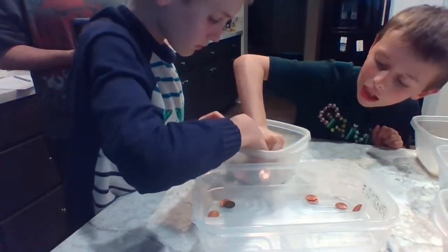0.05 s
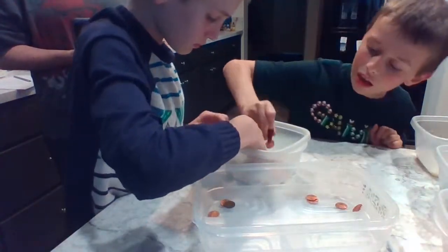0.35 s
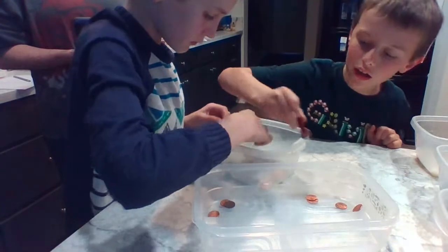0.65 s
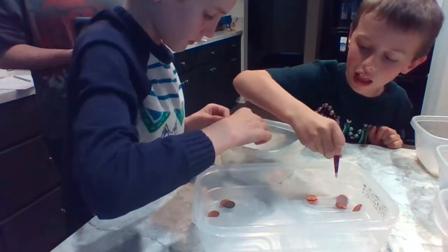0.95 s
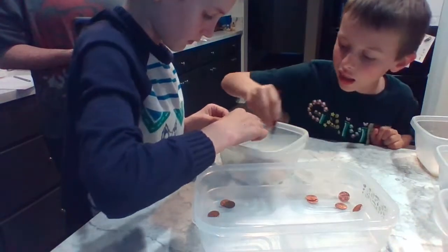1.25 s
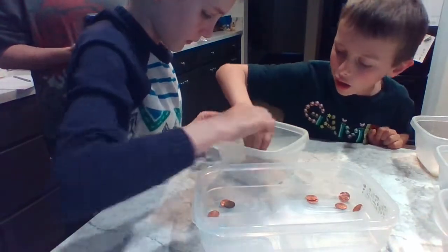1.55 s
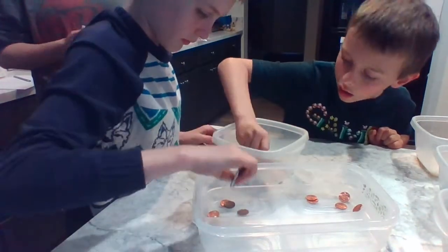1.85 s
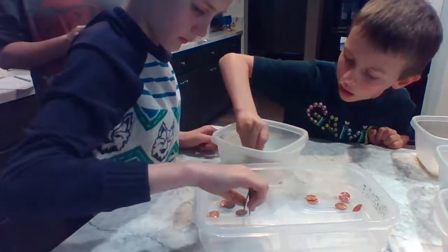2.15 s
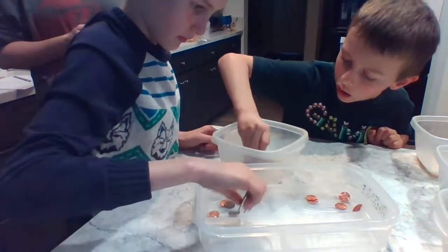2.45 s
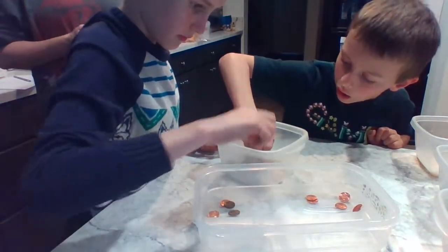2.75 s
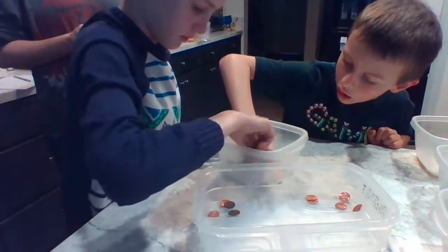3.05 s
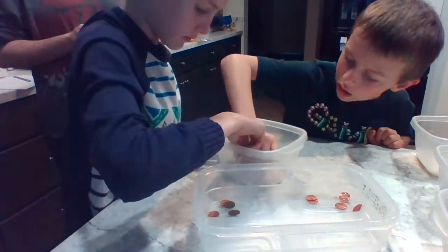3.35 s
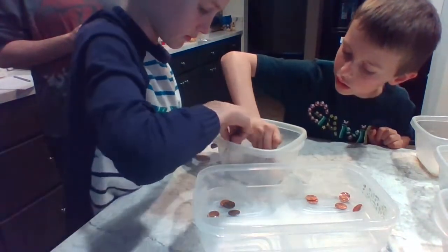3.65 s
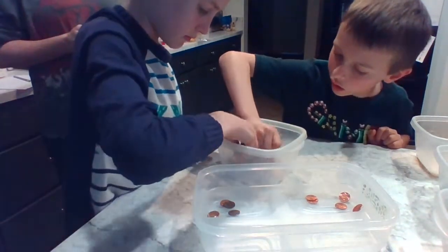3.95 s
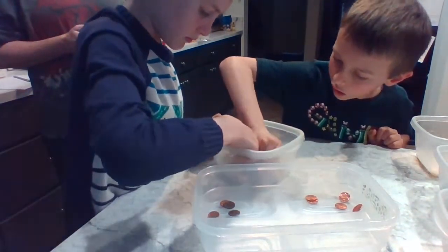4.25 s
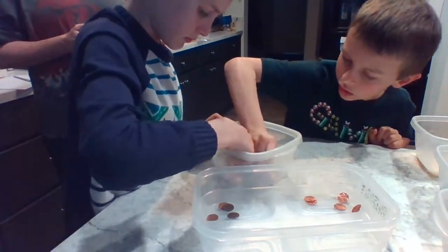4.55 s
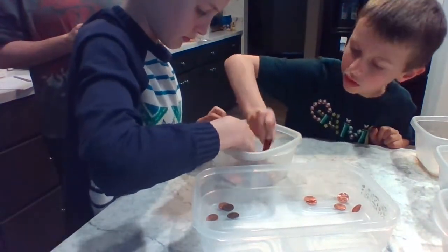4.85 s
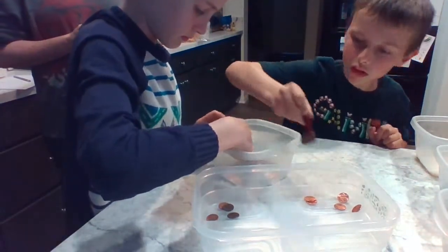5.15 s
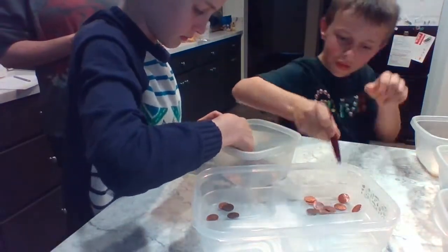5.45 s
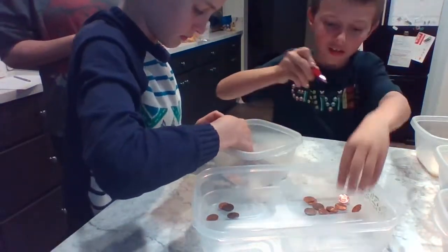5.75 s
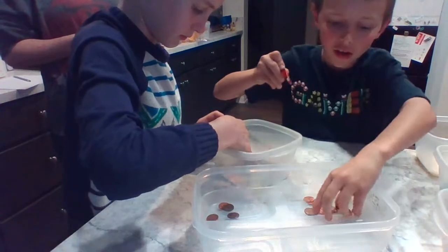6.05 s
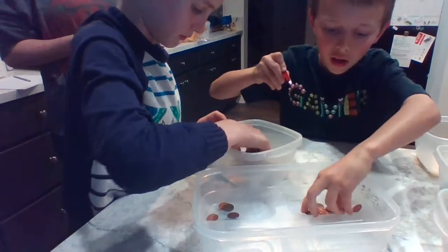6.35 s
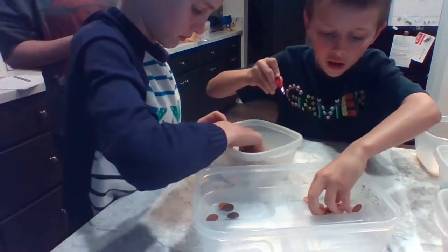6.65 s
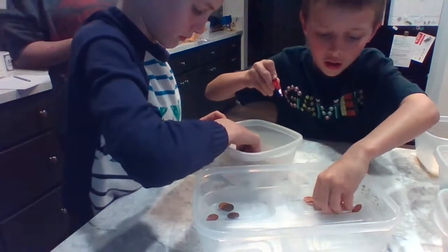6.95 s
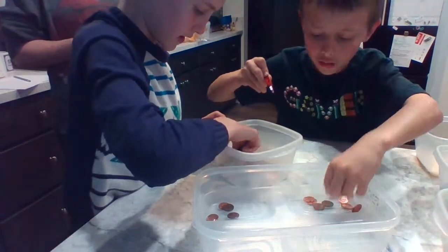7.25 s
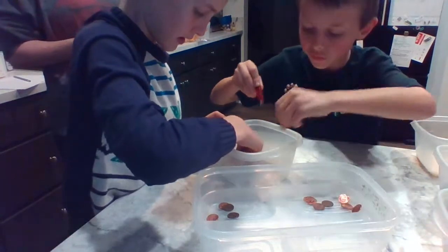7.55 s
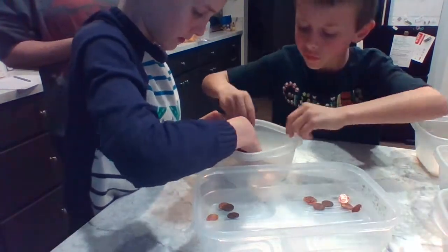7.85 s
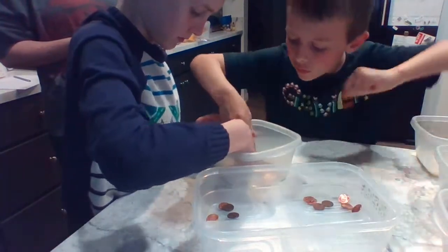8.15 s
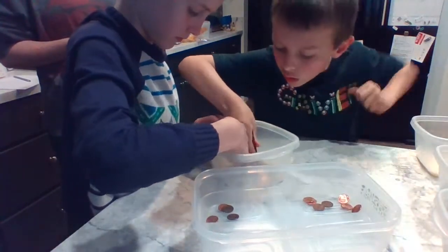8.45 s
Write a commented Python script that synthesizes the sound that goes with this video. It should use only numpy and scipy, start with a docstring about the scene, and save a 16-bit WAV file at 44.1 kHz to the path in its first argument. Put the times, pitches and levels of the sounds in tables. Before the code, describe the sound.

Coins clack, rattle and scrape in plastic containers as metal tweezers move them, with irregular clicks and hollow knocks in a quiet kitchen.

```python
"""Hollow knocks and a light scrape of coins in a small plastic tub, then the clack of a coin in a wide tray.
Tweezers pick coins from the tub and drop them into the plastic tray on a kitchen counter. Each contact
is a sharp clack, then a chatter of tiny bounces and slides; the plastic and the coins ring with it.
The hard kitchen reverberates, and a close camera limits the loudest drops."""
import sys
import numpy as np
from scipy import signal
from scipy.fft import rfft, irfft, next_fast_len
from scipy.io import wavfile
from scipy.ndimage import uniform_filter1d, minimum_filter1d

SR = 44100
rng = np.random.default_rng(int(sys.argv[2]) if len(sys.argv) > 2 else 0)


def generate_wav(signal):
    """Clip the signal to [-1, 1] and save it as 16-bit WAV at the path in sys.argv[1]."""
    frames = np.transpose(np.atleast_2d(signal))
    scaled = np.clip(frames, -1, 1) * 32767
    pcm = np.round(scaled).astype(np.int16)
    wavfile.write(sys.argv[1], SR, pcm)


N = 375291


def amp(db):
    """Decibels to gain."""
    return 10 ** (np.asarray(db) / 20)


def unit(x):
    """x at rms 1."""
    return x / np.sqrt(np.mean(x ** 2) + 1e-20)


def fade(t, t60_s):
    """Decay of 60 dB per t60_s."""
    return np.exp(-np.log(1000) * t / np.maximum(t60_s, 1e-3))


def along(points, hz):
    """(Hz, value) points interpolated on a log axis."""
    f, v = np.transpose(points)
    return np.interp(np.log(hz + 1), np.log(f + 1), v)


def hump(hz, centre_hz, octaves):
    """Bell of height 1 on a log frequency axis."""
    return np.exp(-.5 * (np.log2((hz + 1) / centre_hz) / octaves) ** 2)


def filtered(x, response):
    """x through a frequency response."""
    size = next_fast_len(N + SR // 2)
    return irfft(rfft(x, size) * response(np.fft.rfftfreq(size, 1 / SR)), size)[:N]


def resonances(modes, hz):
    """Causal response of (centre Hz, width Hz, dB) modes."""
    return sum(amp(db) * 1j * hz * width / (centre ** 2 - hz ** 2 + 1j * hz * width)
               for centre, width, db in modes)


def causal(gain):
    """Minimum-phase response: peaks ring after a blow, never before."""
    cepstrum = irfft(np.log(np.maximum(gain, 1e-6)))
    half = cepstrum.shape[-1] // 2
    cepstrum[..., 1:half] *= 2
    cepstrum[..., half + 1:] = 0
    return np.exp(rfft(cepstrum))


def shaped(grain, envelope):
    """Enveloped grain, scaled to the envelope's energy."""
    return unit(grain * envelope) * np.sqrt(np.mean(envelope ** 2))


def add(track, s, sound):
    """Mix a sound in at s seconds."""
    start = max(0, round(s * SR))
    track[start:start + len(sound)] += sound[:max(0, N - start)]


# room noise spectrum: (frequency [Hz], relative density [dB])
AIR_SPECTRUM = [(15, -60), (25, -26.5), (84, -9.5), (236, -7), (420, -9.5), (796, -15), (1300, -20.5),
                (1850, -20), (2800, -24), (7000, -31.5), (11300, -21), (16000, -33.5)]
# electrical whine: (frequency [Hz], rms level [dB])
WHINE_TONES = [(1685, -80), (11590, -81)]


def background(air_db):
    """Still room air and a faint, steady electrical whine."""
    t = np.arange(N) / SR
    air = unit(filtered(rng.standard_normal(N), lambda hz: amp(along(AIR_SPECTRUM, hz))))
    whine = sum(amp(db) * np.sqrt(2) * np.sin(2 * np.pi * hz * t) for hz, db in WHINE_TONES)
    return amp(air_db) * air + whine


# reverberation: (frequency [Hz], t60 [s])
KITCHEN_DECAY = [(150, .36), (1000, .32), (2800, .28), (4600, .29), (7000, .24), (14000, .18)]


def in_kitchen(x, room_db, gap_s=.00076, build_s=.0032):
    """Add counter and cupboard reflections: they build up, then each band decays at its own rate."""
    hz, t, bands = signal.stft(rng.standard_normal(SR // 2), SR, nperseg=256)
    tail = signal.istft(bands * fade(t, along(KITCHEN_DECAY, hz)[:, None]), SR, nperseg=256)[1]
    tail *= np.clip((np.arange(len(tail)) / SR - gap_s) / build_s, 0, 1)
    response = amp(room_db) * tail / np.linalg.norm(tail)
    response[0] = 1  # direct path
    return signal.fftconvolve(x, response)


# container shoved against the counter: (time [s], level [dB])
SHOVES = [(3.621, -34.5), (3.75, -39.5), (3.865, -39), (5.846, -40.5), (6.154, -36.5)]
# heavy contacts carried into the counter: (time [s], level [dB])
COUNTER_THUMPS = [(1.9, -47), (2.59, -48), (7.78, -50)]


def thuds(rows, band_hz, t60_s):
    """Dull pushes on the counter: short bursts of low noise."""
    track, t = np.zeros(N), np.arange(SR // 4) / SR
    band = signal.butter(2, band_hz, "bandpass", fs=SR, output="sos")
    envelope = fade(t, t60_s)
    for s, db in rows:
        push = signal.sosfilt(band, rng.standard_normal(len(t)) * envelope)
        add(track, s, amp(db) * unit(push) * np.sqrt(np.mean(envelope ** 2)))
    return track


# fingertip on the tub: (time [s], swell [s], level [dB], floor [Hz], wall [Hz], wall gain [dB])
RUBS = [(.62, .025, -54, 720, 3500, -15), (.70, .02, -51, 700, 1400, -17),
        (4.21, .035, -48, 660, 2080, -14), (4.335, .04, -39.5, 700, 2120, -13.5),
        (4.683, .025, -40.5, 695, 2600, -18.5), (5.145, .012, -56, 1000, 6920, -0.5),
        (5.293, .022, -53, 970, 1440, -23), (5.39, .04, -42.5, 980, 4900, -8),
        (6.094, 0.029, -30.5, 880, 4030, -23), (8.27, .045, -51, 680, 3200, -26)]


def finger_rubs(floor_width_hz=110, wall_width_hz=230, skin_db=-26, t60_s=.11):
    """A soft fingertip swells one floor note and one wall note, without a click."""
    track, size = np.zeros(N), SR // 4
    t, hz = np.arange(size) / SR, np.fft.rfftfreq(size, 1 / SR)
    skin = amp(skin_db + along(CONTACT_SPECTRUM, hz))
    for s, swell_s, db, floor_hz, wall_hz, wall_db in RUBS:
        ringing = resonances([(floor_hz, floor_width_hz, 0), (wall_hz, wall_width_hz, wall_db)], hz)
        rub = irfft(rfft(rng.standard_normal(size)) * (ringing + skin), size)
        envelope = np.minimum(t / swell_s, 1) ** 2 * fade(np.maximum(t - swell_s, 0), t60_s)
        add(track, s, amp(db) * shaped(rub, envelope))
    return in_kitchen(track, room_db=-7.5)[:N]


# square taps on the plastic floor: (time [s], pitch [Hz], level [dB])
FLOOR_TAPS = [(.087, 943, -25), (.105, 711, -30), (7.364, 948, -18.5)]


def floor_notes(rise_s=.008, t60_s=.2):
    """The floor's drum mode builds over a few cycles and dies away."""
    track, t = np.zeros(N), np.arange(SR // 2) / SR
    envelope = (1 - np.exp(-t / rise_s)) * fade(t, t60_s)
    for s, hz, db in FLOOR_TAPS:
        add(track, s, amp(db) * envelope * np.sin(2 * np.pi * hz * t))
    return track


# metal left free after a contact: (time [s], pitch [Hz], level [dB], t60 [s])
METAL_RINGS = [(1.209, 4500, -25, .2), (3.62, 3740, -36, .15), (5.477, 12090, -49, 1.6),
               (7.362, 4145, -46, .45)]


def ringing_metal():
    """An undamped coin or tweezer arm rings on; its twin modes beat."""
    track, t = np.zeros(N), np.arange(SR) / SR
    for s, hz, db, t60_s in METAL_RINGS:
        beat_hz = rng.uniform(10, 22)
        twins = np.sin(2 * np.pi * hz * t) + .5 * np.sin(2 * np.pi * (hz + beat_hz) * t)
        add(track, s, amp(db) * fade(t, t60_s) * twins)
    return track


def tinks(strokes, rate_hz, centre_hz, octaves, t60_s, scatter_db, room_db, max_count=60):
    """Metal edges catch and slip along each (s, length s, dB) stroke: brief, randomly pitched notes."""
    track, t = np.zeros(N), np.arange(SR // 8) / SR
    for s, length_s, db in strokes:
        delays_s = np.cumsum(rng.exponential(1 / rate_hz, max_count))
        pitches_hz = centre_hz * 2 ** (octaves * rng.uniform(-1, 1, max_count))
        levels_db = db + scatter_db * rng.uniform(-1, 1, max_count)
        for delay_s, hz, tink_db in zip(delays_s, pitches_hz, levels_db):
            if delay_s < length_s:
                add(track, s + delay_s, amp(tink_db) * np.sin(2 * np.pi * hz * t) * fade(t, t60_s))
    return in_kitchen(track, room_db)[:N]


# tweezer strokes: (time [s], length [s], level [dB])
TWEEZER_STROKES = [(2.87, .13, -41), (3.035, 0.12, -33), (3.165, 0.23, -51.5), (3.365, 0.058, -42),
                   (3.49, .11, -53)]


def tweezer_scrapes():
    """Tweezer tips scratch over coins in dense, very short tinks."""
    return tinks(TWEEZER_STROKES, rate_hz=280, centre_hz=4880, octaves=.32, t60_s=.0059,
                 scatter_db=6.5, room_db=-2.5)


# spinning coins: (time [s], length [s], level [dB])
RIM_SPINS = [(1.9, .04, -46), (2.32, .05, -36.5), (5.48, .11, -25), (6.16, 0.11, -31.5), (6.9, .1, -34),
             (7.778, .14, -29)]


def rim_shimmer():
    """Jolted coins spin on their rims with a high shimmer."""
    return tinks(RIM_SPINS, rate_hz=210, centre_hz=12700, octaves=.081, t60_s=.019,
                 scatter_db=6.5, room_db=-7.5)


def bounces(t, rate_hz=90, scatter_db=4.5, t60_s=.011, sliding_share=.34):
    """Envelope (rms 1) of tiny uneven bounces over steady sliding."""
    kicks = (rng.random(len(t)) < rate_hz / SR) * amp(scatter_db * rng.uniform(-1, 1, len(t))) ** 2
    power = signal.lfilter([1], [1, -fade(1 / SR, t60_s) ** 2], kicks)
    return np.sqrt(sliding_share + (1 - sliding_share) * power / (power.mean() + 1e-20))


def touch_point(hz, depth_db=3.2, spacing_hz=260):
    """Each contact point favours its own random resonances."""
    knots = hz / spacing_hz
    heights = rng.standard_normal(int(knots[-1]) + 2)
    return unit(amp(depth_db * np.interp(knots, np.arange(len(heights)), heights)))


# modes of tray, tub and plastic-damped coin rims: (frequency [Hz], width [Hz], gain [dB])
TRAY_RESONANCES = [(979, 83, 4.5), (1419, 56, -0.5), (1946, 57, -2.5), (2690, 77, 0), (4660, 480, -19.5)]
TUB_RESONANCES = [(704, 21, -1.5), (980, 66, -2.5), (1400, 36, -18), (1807, 31, -7), (3040, 180, -14.5)]
RIM_RESONANCES = [(13200, 30, -1.5), (12300, 25, 5.5), (13300, 51, 17)]


def container(hz, modes, direct_db, plastic_db, coin_db, pitch_scatter=.02):
    """A blow sounds directly and through plastic and coins, whose pitch shifts with grip and load."""
    plastic = resonances(modes, hz * (1 + pitch_scatter * rng.standard_normal()))
    coins = resonances(RIM_RESONANCES, hz * (1 + pitch_scatter * rng.standard_normal()))
    return amp(direct_db) + amp(plastic_db) * plastic + amp(coin_db) * coins


# metal-on-plastic spectrum: (frequency [Hz], relative density [dB])
CONTACT_SPECTRUM = [(40, -43.5), (100, -35), (200, -30), (450, -14), (700, -5.5), (1000, -1.5), (1600, -1),
                    (2800, -3), (4300, -3.5), (6300, -10.5), (8000, -16), (11000, -15), (13300, -35),
                    (16000, -30)]
EDGE_RISE_S, LANDING_RISE_S, PUSH_RISE_S = .00038, .001, .0018


def contacts(hits, body, room_db, swell, hollow_hz, hollow_octaves, ting_hz, sag_db_per_s=19, points=3):
    """Metal on plastic: one clack, then chatter at several points that sags and dies."""
    track = np.zeros(N)
    for s, clack_db, rise_s, chatter_db, hold_s, t60_s, hollow_db, mid_db, ting_db in hits:
        n = 32768 if hold_s else 8192
        t, hz = np.arange(n) / SR, np.fft.rfftfreq(n, 1 / SR)
        grit = np.array([bounces(t) for _ in range(points)])
        swell_s = swell * np.sqrt(t60_s) + 1e-5  # longer decay, gentler onset
        onset = 1 - np.exp(-t / swell_s)
        envelope = onset * amp(-sag_db_per_s * t) * fade(np.maximum(t - hold_s, 0), t60_s)
        chatter = shaped(grit * rng.standard_normal((points, n)), envelope)
        clack = shaped(rng.standard_normal(n), t / rise_s * np.exp(1 - t / rise_s))
        force = amp(chatter_db) * chatter / np.sqrt(points)
        force[0] += amp(clack_db) * clack
        # flat landings sound hollow; edge and coin-on-coin contacts are brighter
        treble_shelf = 1 - 1 / (1 + (hz / ting_hz) ** 6)
        colour_db = (hollow_db * hump(hz, hollow_hz, hollow_octaves)
                     + mid_db * hump(hz, centre_hz=1060, octaves=.54)
                     + ting_db * treble_shelf)
        gain = unit(amp(along(CONTACT_SPECTRUM, hz))) * amp(colour_db)
        touches = np.array([touch_point(hz) for _ in range(points)])
        ringing = np.array([container(hz, **body) for _ in range(points)])
        spectra = rfft(force) * causal(gain * touches) * ringing
        add(track, s, in_kitchen(irfft(spectra.sum(axis=0)), room_db))
    return track


# action in the tray: (start [s], end [s])
TRAY_SPANS = [(1, 2.8), (5.4, 7.5)]


def tray_and_tub(hits):
    """Hits ring the wide tray during its spans, otherwise the small tub."""
    tray_hits = [hit for hit in hits if any(start <= hit[0] < end for start, end in TRAY_SPANS)]
    tub_hits = [hit for hit in hits if hit not in tray_hits]
    tray = dict(modes=TRAY_RESONANCES, direct_db=-1.5, plastic_db=3, coin_db=1)
    tub = dict(modes=TUB_RESONANCES, direct_db=-5, plastic_db=4.5, coin_db=4)
    tray_sound = contacts(tray_hits, tray, room_db=-5, swell=.02,
                          hollow_hz=706, hollow_octaves=.64, ting_hz=6020)
    tub_sound = contacts(tub_hits, tub, room_db=-4.5, swell=.018,
                         hollow_hz=650, hollow_octaves=.62, ting_hz=6800)
    return tray_sound + tub_sound


# coins pushed on plastic: (time [s], length [s], level [dB], hollow [dB], mid [dB], ting [dB])
COIN_SLIDES = [(.002, 0.064, -34.5, -8, 9, 3), (1.703, 0.12, -40, 8, -2, 7.5),
               (1.775, 0.098, -33.5, 8.5, 0.5, -3), (2.145, 0.097, -46.5, 9, 0.5, 7),
               (2.305, 0.52, -33.5, -4.5, 6.5, -1), (2.86, 0.051, -25.5, 1, -4, 2.5),
               (2.989, 0.25, -38.5, 4.5, 1.5, 5), (3.306, 0.082, -47, -5, 13, 12),
               (3.596, .02, -37.5, 13.5, -2, 5), (3.631, 0.023, -24, 6, -4.5, 5),
               (4.04, 0.11, -34, 10.5, -5, -2.5), (6.186, 0.1, -27, -9, 1, 1),
               (6.481, 0.2, -35, -19.5, 13, -6), (6.772, 0.023, -26, -1.5, -7, 1.5),
               (6.851, 0.051, -23.5, -36, 9, -10.5), (6.889, 0.095, -21, -8.5, 0, -6.5),
               (7.047, .21, -34.5, -18, 8, -0.5), (7.979, 0.1, -32, 4, -1.5, 8),
               (8.472, 0.045, -24.5, -7.5, 6, 5)]


def slide_hits(clack_db=-13, release_t60_s=.15):
    """Pushed coins chatter for the length of the stroke."""
    return [(s, db + clack_db, PUSH_RISE_S, db, length_s, release_t60_s, *colour)
            for s, length_s, db, *colour in COIN_SLIDES]


def slide_tinks(gain_db=-5, ting_weight=1.03):
    """Sliding coins catch on each other, louder in bright slides."""
    strokes = [(s, length_s, db + gain_db + ting_weight * ting_db)
               for s, length_s, db, *_, ting_db in COIN_SLIDES]
    return tinks(strokes, rate_hz=90, centre_hz=7520, octaves=.92, t60_s=.015,
                 scatter_db=6.5, room_db=-2)


# fingers or tweezers on plastic: (time [s], level [dB], hollow [dB], mid [dB], ting [dB])
PLASTIC_KNOCKS = [(0.086, -20.5, 10, 1.5, 7.5), (0.115, -24.5, 8.5, -3, 13), (0.347, -37.5, 16, -2, 18),
                  (1.755, -22, 14.5, 2.5, -1.5), (2.32, -15, 5, 1.5, 2.5), (2.58, -11, -3, 5, -1.5),
                  (2.591, -29, 2, 7, -11), (2.854, -14.5, 1.5, -2, 2), (3.618, -15.5, 9, -2.5, -1),
                  (3.752, -35.5, 10, -1.5, 2), (3.865, -24, 4.5, 6, 9.5), (5.845, -33.5, 14.5, -2.5, 4.5),
                  (5.88, -41, 22.5, -16, 12.5), (6.155, -10.5, 14.5, -14.5, 3), (7.362, -20.5, 7, -2, 6)]


def knock_hits(clack_db=-7.5, hollow_weight=.5, t60_s=.082):
    """A flat push sounds the floor and jolts the coins; the hollower, the stronger its first blow."""
    return [(s, db + clack_db + hollow_weight * hollow_db, PUSH_RISE_S, db, 0, t60_s,
             hollow_db, mid_db, ting_db) for s, db, hollow_db, mid_db, ting_db in PLASTIC_KNOCKS]


# coin edges and tweezer tips: (time [s], level [dB], mid [dB], ting [dB])
EDGE_CLICKS = [(1.087, -2, -7.5, 4), (1.111, -2.5, -6, -1.5), (1.207, -7.5, 2, 8), (1.2295, 3, -2.5, -2),
               (1.263, -11.5, -9, 9), (1.755, -5.5, 13, 3.5), (1.848, -1, -17, -1), (1.941, -5.5, -2, -6.5),
               (2.102, -8, 7, -4), (2.302, -13, 12.5, -6.5), (2.41, -3, 4, -6), (2.494, -2.5, 3.5, -6),
               (2.576, -1.5, -4, -11), (2.582, -11.5, 19, -2.5), (2.637, 0, -10, -8), (3.108, -18, -20, -5),
               (4.118, -27, -1, -13), (4.158, -21, -5, 5.5), (5.551, 3.5, -3, 1), (5.571, 2.5, 5.5, 4.5),
               (6.368, -14, 7, -18), (6.409, -14, 5, -22), (6.525, -10, -2, -6), (6.668, -15, 9.5, 4.5),
               (6.75, -11, 1, -2.5), (6.796, -16, 7, 5.5), (6.898, -12, 9, 8), (6.949, -1.5, 0, -2),
               (7.022, -5.5, -20, -9), (7.088, -18, 0, -15), (7.106, -2, 3.5, -2.5),
               (7.202, -15.5, 5, -1.5), (7.209, -7, 5, 2), (7.328, -18, -3, 5), (7.787, 4, -3.5, -12),
               (7.861, 0.5, 12.5, 3.5), (7.929, -8.5, 11.5, 3.5), (8.046, -18.5, 11, 10)]


def edge_clicks(clack_db=-1.5, chatter_db=-7, t60_s=.041, hollow_db=-16.5):
    """An edge-on touch is mostly clack and barely moves the plastic."""
    hits = [(s, db + clack_db, EDGE_RISE_S, db + chatter_db, 0, t60_s, hollow_db, *colour)
            for s, db, *colour in EDGE_CLICKS]
    body = dict(modes=TRAY_RESONANCES, direct_db=-3, plastic_db=-4.5, coin_db=-.5)
    return contacts(hits, body, room_db=-7, swell=.013, hollow_hz=680, hollow_octaves=.72, ting_hz=5900)


# dropped coins: (time [s], level [dB], rattle hold [s], hollow [dB], mid [dB], ting [dB])
COIN_DROPS = [(1.049, -8, 0.0058, -7, 2, 7.5), (1.898, -4.5, 0.03, -13, 4, 3),
              (5.476, -4, 0.077, -9.5, 6, 1), (7.774, -3, 0.067, 2, -2, 9)]


def drop_hits(clack_db=-1.5, landing_t60_s=.13,
              rattle_delay_s=.025, rattle_db=-14.5, rattle_t60_s=.59, rattle_ting_db=-4.5):
    """A coin lands with a clack and a burst of bounces, then rocks itself flat."""
    landings, rattles = [], []
    for s, db, hold_s, hollow_db, mid_db, ting_db in COIN_DROPS:
        landings.append((s, db + clack_db, LANDING_RISE_S, db, 0, landing_t60_s,
                         hollow_db, mid_db, ting_db))
        rattles.append((s + rattle_delay_s, db + rattle_db, EDGE_RISE_S, db + rattle_db, hold_s,
                        rattle_t60_s, hollow_db, mid_db, ting_db + rattle_ting_db))
    return landings + rattles


def drop_chimes(extra_s=.04, gain_db=-24):
    """A dropped coin's bounces ring briefly at scattered pitches."""
    strokes = [(s, hold_s + extra_s, db + gain_db) for s, db, hold_s, *_ in COIN_DROPS]
    return tinks(strokes, rate_hz=210, centre_hz=3330, octaves=.97, t60_s=.02,
                 scatter_db=7.5, room_db=-9.5)


def scene():
    """Mono mix of clacks, tinks, counter thuds, ringing plastic and metal, and room air."""
    clacks = tray_and_tub(drop_hits() + knock_hits() + slide_hits()) + edge_clicks()
    metal = slide_tinks() + tweezer_scrapes() + rim_shimmer() + drop_chimes()
    shoves = thuds(SHOVES, band_hz=(205, 427), t60_s=.17)
    thumps = thuds(COUNTER_THUMPS, band_hz=(40, 130), t60_s=.21)
    plastic = finger_rubs() + floor_notes()
    return (clacks + metal + shoves + thumps + plastic + ringing_metal() + background(air_db=-63.5))[None]


def limiter(x, ceiling_db, window_samples=129):
    """Gain dips briefly to keep each peak under the ceiling."""
    needed = np.minimum(1, amp(ceiling_db) / (np.abs(x) + 1e-9))
    return x * uniform_filter1d(minimum_filter1d(needed, window_samples), window_samples)


def record(dry):
    """The camera limits peaks and cuts the top of the band."""
    cutoff_hz, transition_hz = 16100, 400
    held = limiter(dry[0], ceiling_db=-3)
    return filtered(held, lambda hz: np.clip((cutoff_hz - hz) / transition_hz + .5, 0, 1))[None]


dry = scene()
out = record(dry)
generate_wav(out)
```